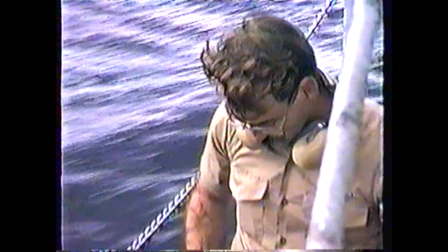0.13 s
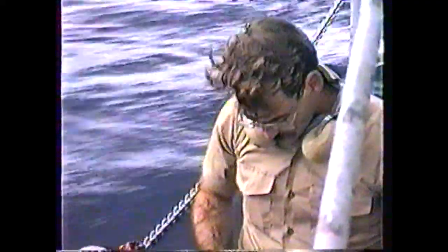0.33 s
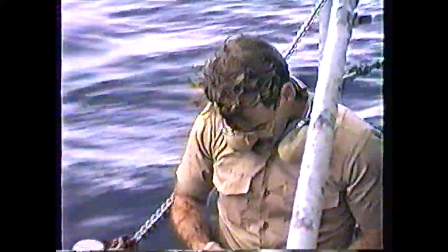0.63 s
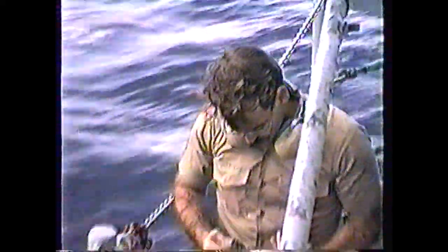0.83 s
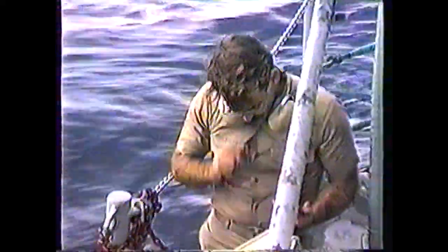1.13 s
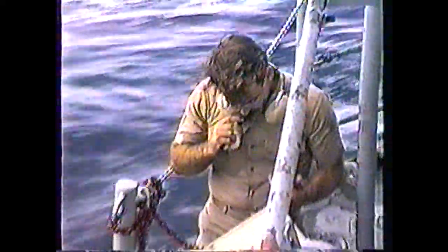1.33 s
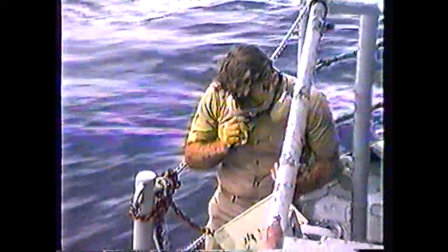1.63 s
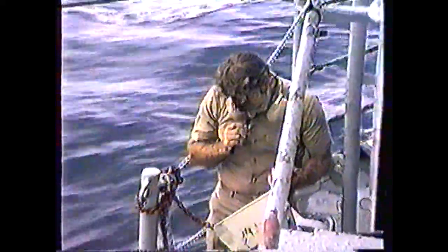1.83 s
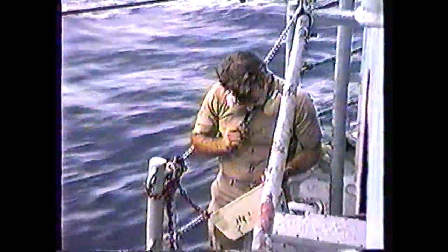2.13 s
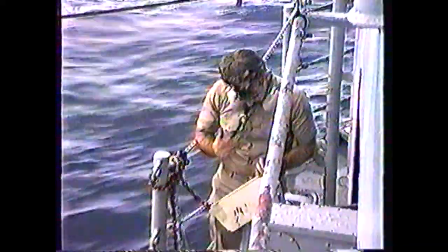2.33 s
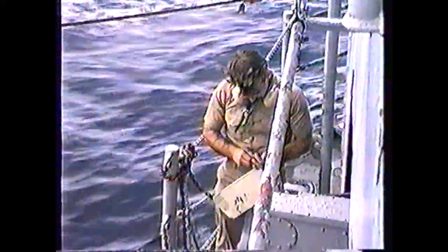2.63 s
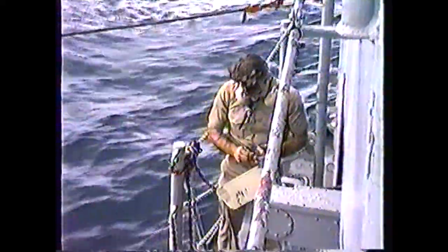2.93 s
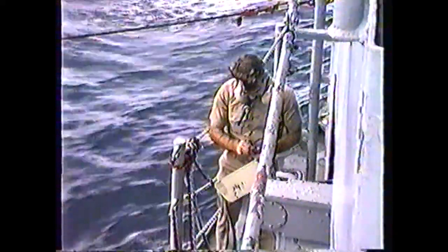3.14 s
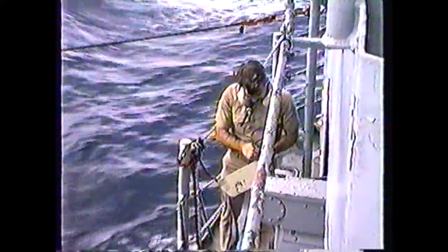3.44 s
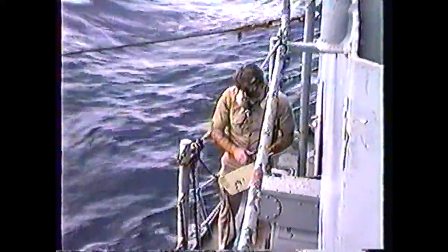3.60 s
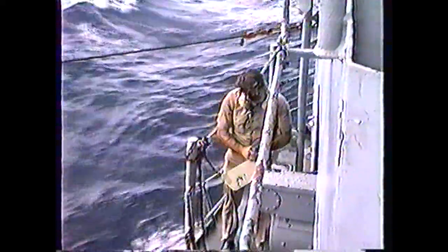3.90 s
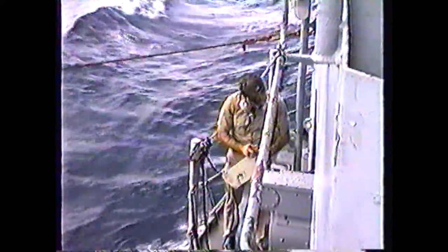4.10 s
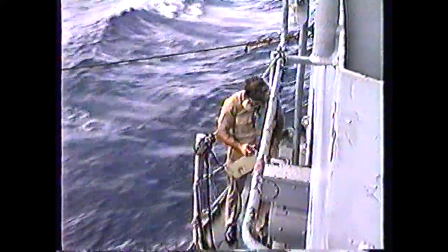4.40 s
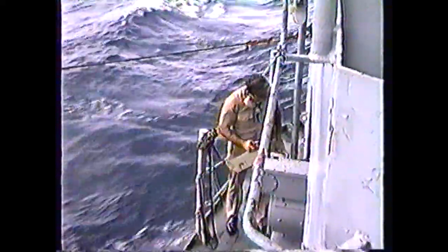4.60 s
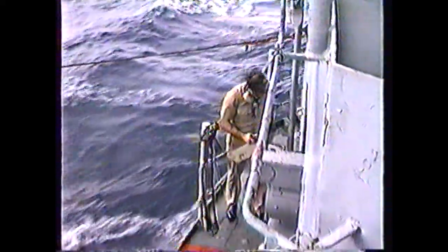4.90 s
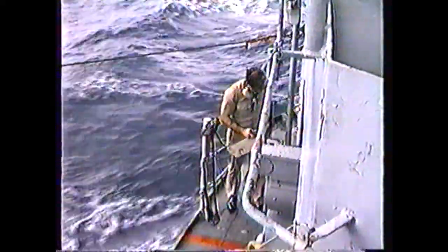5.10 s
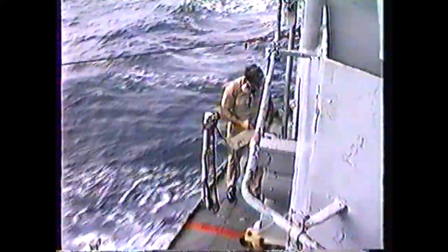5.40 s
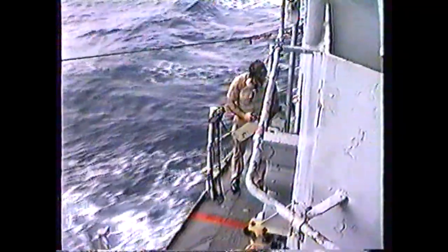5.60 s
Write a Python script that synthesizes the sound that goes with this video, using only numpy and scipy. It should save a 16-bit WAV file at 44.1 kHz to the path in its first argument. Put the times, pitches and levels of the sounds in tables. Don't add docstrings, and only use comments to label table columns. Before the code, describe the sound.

Continuous ship machinery hum and exhaust roar dominate, wavering as wind carries them, with a steady wash of sea beneath. Low gusts rumble on the camera microphone. Near 3.5 seconds everything sinks briefly and slowly returns; a small metal fitting ticks twice around 4.3 seconds as gusts peak. Outdoor, unechoing, near-mono worn tape with gritty metallic hiss. No speech.

```python
import sys
import numpy as np
from scipy import signal
from scipy.fft import rfft, irfft, next_fast_len
from scipy.io import wavfile
from scipy.ndimage import uniform_filter1d, map_coordinates

SR = 44100
rng = np.random.default_rng(int(sys.argv[2]) if len(sys.argv) > 2 else 0)


def unload_wav(signal):
    wavfile.write(
        sys.argv[1],
        SR,
        np.round(np.clip(np.atleast_2d(signal).T, -1, 1) * 32767).astype(np.int16),
    )


def boost(x):
    u = np.asarray(x, float) / 20
    return 10 ** u


N = 253575


def drift(rate_hz):
    knots = rng.standard_normal(400)
    return map_coordinates(knots, [np.arange(N) * rate_hz / SR], order=3)


def coloured(spectrum):
    hz, db = np.transpose(spectrum)
    size = next_fast_len(N)
    bins_hz = np.arange(size // 2 + 1) * SR / size
    gain = boost(np.interp(np.log(bins_hz + 1), np.log(hz), db))
    noise = irfft(rfft(rng.standard_normal(size)) * gain, size)[:N]
    return noise / np.sqrt(np.mean(noise ** 2) + 1e-20)


def levelled(x, hold_s):
    hold = int(hold_s * SR)
    power = uniform_filter1d(uniform_filter1d(x ** 2, size=hold), size=hold)
    return x / np.sqrt(power + 1e-12)


def bumps(rows, rise_s, fall_s):
    t = np.arange(N) / SR
    total_db = np.zeros(N)
    for s, db in rows:
        total_db += db * np.interp(t, [s - rise_s, s, s + fall_s], [0, 1, 0])
    return total_db


# time in seconds, level in dB.
GAIN = [(0, -16.5), (1.2, -16), (1.7, -15.5), (2.0, -17), (2.25, -17.5), (2.52, -16), (2.72, -18.5),
        (3.0, -18), (3.35, -16), (3.43, -20), (3.53, -25.5), (3.7, -22.5), (3.95, -21.5), (4.15, -21),
        (4.42, -16.5), (5.0, -17.5), (5.42, -17), (5.75, -17.5)]


def deck_db(offset_db, follows=1):
    s, db = np.transpose(GAIN)
    gain_db = np.interp(np.arange(N) / SR, s, db)
    mean_db = gain_db.mean()
    return mean_db + follows * (gain_db - mean_db) + offset_db


# base in Hz, orders as pairs of multiple and level in dB re roar.
MACHINES = [
    (175.25, [(1, -16.5), (2, -16), (4, -18.5), (5, -20)]),
    (261.8, [(1, -21.5), (2, -19.5), (4, -27)]),
]


def engine():
    out = np.zeros(N)
    for base_hz, orders in MACHINES:
        turns = np.cumsum(base_hz * (1 + .006 * drift(6.0))) / SR
        for multiple, db in orders:
            level = np.sqrt(2) * boost(db + 2.3 * drift(11.0))
            out += level * np.sin(2 * np.pi * (multiple * turns + rng.random()))
    return out


# frequency in Hz, density in dB per Hz.
ROAR = [(60, -61), (100, -18.5), (140, -7), (174, 2), (200, -9.5), (230, -10), (285, -14), (335, -1.5),
        (395, -6.5), (450, -6), (590, -9.5), (860, -8), (1010, -15.5), (1400, -50)]
# time in seconds, change in dB.
THROBS = [(.46, 2.5), (.53, -1), (.56, 2.5), (1.57, -3.5), (1.88, 3), (1.98, 0), (2.05, 2), (2.39, -3),
          (2.91, 4), (3.55, -2), (3.73, 2.5), (3.76, -6), (3.92, 1), (4.26, 1), (4.38, -2), (4.79, 3),
          (5.41, 4), (5.435, -4), (5.49, 1.5), (5.56, -1.5), (5.68, -2)]
# time in seconds, change in dB.
SURGES = [(.46, 3), (.53, -1.5), (1.98, 2.5), (2.34, 4), (2.43, 0.5), (2.93, -6), (2.98, -2), (3.003, 7),
          (3.08, 6), (3.12, -4), (3.17, 3), (3.47, -1), (3.51, 0.5), (3.99, -8), (4.21, 3), (4.87, -5),
          (5.06, -2), (5.43, 2), (5.49, -5.5), (5.52, 6.5), (5.555, -11.5), (5.575, 10), (5.635, -5),
          (5.655, 6), (5.69, -3)]


def drone():
    whole = boost(-4.5) * coloured(ROAR) + engine()
    low = signal.sosfiltfilt(signal.butter(4, 550, fs=SR, output="sos"), whole)
    upper = whole - low
    low_db = deck_db(-2.6) + bumps(THROBS, rise_s=0.031, fall_s=0.062)
    upper_db = deck_db(-4, follows=1.03) + bumps(SURGES, rise_s=0.036, fall_s=0.035)
    return boost(low_db) * levelled(low, 0.066) + boost(upper_db) * levelled(upper, 0.13)


# frequency in Hz, density in dB per Hz.
WASH = [(590, -62), (1000, -1.5), (1270, -4), (1580, -10), (2300, -18), (2990, -27), (5060, -120)]
SEA_DB, SEA_FOLLOWS = -13.0, 0.96


def sea():
    level_db = deck_db(SEA_DB, SEA_FOLLOWS) + 3.0 + 0.64 * drift(14.0)
    return boost(level_db) * coloured(WASH)


# frequency in Hz, density in dB per Hz.
BUFFET = [(9, -50), (20, -24), (40, -10.5), (68, -1), (95, 0.5), (125, -41), (220, -120)]
# peak time in seconds, peak level in dB, length in seconds.
GUSTS = [(0, -41, .1), (.08, -38, .09), (.38, -39, .2), (.96, -45, .3), (1.17, -48, .15), (1.47, -50.5, .2),
         (1.65, -42, .22), (1.81, -42, .14), (1.98, -43, .12), (2.33, -48, .3), (2.47, -40, .12),
         (2.63, -36, .2), (2.85, -37, 0.45), (3.23, -42, .14), (3.41, -42, .08), (3.79, -40, .08),
         (3.9, -41, .2), (4.286, -33, .14), (4.4, -37, .15), (4.55, -36, .13), (4.66, -30, .15),
         (4.787, -30, .2), (4.93, -34, 0.14), (5.046, -31, .11), (5.19, -37, .09), (5.41, -39, .13),
         (5.6, -38, .12), (5.7, -38, .12)]
CALM_DB, GUST_DEPTH_DB, GUST_RISE_SHARE = -48, 8, 0.58


def wind():
    t = np.arange(N) / SR
    level_db = np.full(N, float(CALM_DB))
    for s, db, length_s in GUSTS:
        before = (s - t) / GUST_RISE_SHARE
        after = (t - s) / (1 - GUST_RISE_SHARE)
        away = np.maximum(before, after) / length_s
        level_db = np.maximum(level_db, db - GUST_DEPTH_DB * away)
    return boost(level_db) * levelled(coloured(BUFFET), 0.14)


# start in seconds, level in dB of each of the three modes.
CLINKS = [
    (4.296, -21.5, -34, -38),
    (4.380, -37, -30, -35),
]
# frequency in Hz, 60 dB decay time in seconds.
FITTING = [(1435, .16), (2420, .09), (1880, .07)]


def fitting():
    out = np.zeros(N)
    for s, *levels_db in CLINKS:
        t = np.arange(N - round(s * SR)) / SR
        onset = 1 - np.exp(-t / 0.00079)
        for (hz, t60_s), db in zip(FITTING, levels_db):
            out[-len(t):] += boost(db - 60 * t / t60_s) * onset * np.sin(2 * np.pi * hz * t)
    return out


def tape_hiss():
    return boost(deck_db(SEA_DB - 30, SEA_FOLLOWS)) * rng.standard_normal(N)


def scene():
    return np.tile(drone() + sea() + wind() + fitting() + tape_hiss(), (2, 1))


LEFT_JUMPS = [(.02, -.7), (.802, 2.25), (.94, -2.13)]
RIGHT_JUMPS = [(.31, -2.55), (.48, -.67), (.59, .71), (.712, 2.1), (.81, .62)]
SLIP_HZ = 3897.51


def slipped(x, jumps, lead_samples):
    share = np.arange(N) * SLIP_HZ / SR % 1
    timing = sum(jump * ((share > at) - share) for at, jump in jumps)
    place = np.arange(N) + timing - timing.mean() + lead_samples
    return map_coordinates(x, [place], order=3, mode="mirror")


# frequency in Hz, gain in dB.
TOP_COLOUR = [(9800, 0), (10800, -3.5), (11200, -8), (11600, 3), (11800, -6), (12400, 5), (13000, 0),
              (13800, -5), (14300, 5), (15200, 0)]
# low edge in Hz, high edge in Hz, share of blocks kept.
STARVED = [(3800, 3990, .7), (7600, 7900, .7), (11350, 11650, .85), (11650, 11900, .65), (13450, 13800, .9),
           (13800, 14300, .6), (14300, 16000, .1)]
BLOCK = 1024


def patchy_top(x):
    hz, db = np.transpose(TOP_COLOUR)
    size = next_fast_len(N)
    bins_hz = np.arange(size // 2 + 1) * SR / size
    spectrum = rfft(x, size) * boost(np.interp(bins_hz, hz, db))
    spectrum[1, bins_hz > 14300] *= boost(-11)
    out = irfft(spectrum, size)[:, :N]
    power = x[0] ** 2
    loud = uniform_filter1d(power, size=8000)[::BLOCK] / np.mean(power)
    for low_hz, high_hz, kept in STARVED:
        keep_chance = kept ** (1 / np.clip(loud, .4, 1.2) ** (1 - kept))
        dropped = np.repeat(rng.random(len(loud)) > keep_chance, BLOCK)[:N]
        in_band = (bins_hz >= low_hz) * (bins_hz < high_hz)
        band = irfft(spectrum * in_band, size)[:, :N]
        out -= band * uniform_filter1d(1. * dropped, size=400)
    return out


def top_cut(x):
    return signal.sosfilt(signal.butter(12, 15000, fs=SR, output="sos"), x)


def record(dry):
    tape = 0.78 * np.tanh(dry[0] / .8)
    left = slipped(tape, LEFT_JUMPS, lead_samples=0)
    right = boost(.12) * slipped(tape, RIGHT_JUMPS, lead_samples=2.2)
    loudness = np.sqrt(uniform_filter1d(tape ** 2, size=4000))
    hiss = boost(-31 + 3 * drift(6.7)) * loudness * rng.standard_normal((2, N))
    mix = patchy_top(np.array([left, right]) + hiss)
    return top_cut(mix)


dry = scene()
out = record(dry)
unload_wav(out)
```